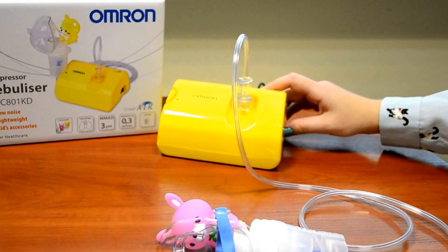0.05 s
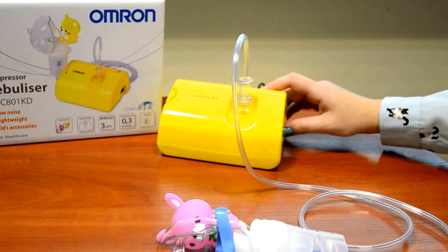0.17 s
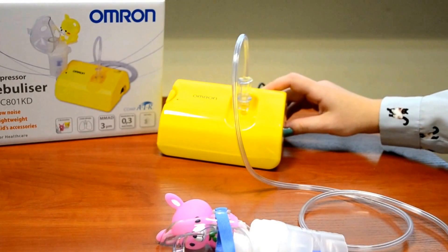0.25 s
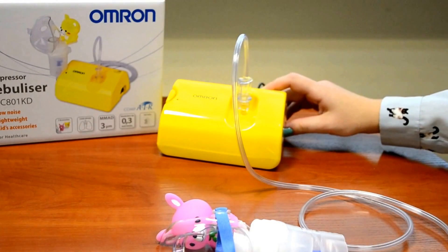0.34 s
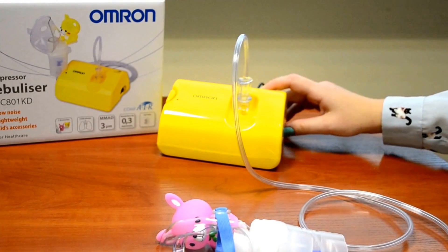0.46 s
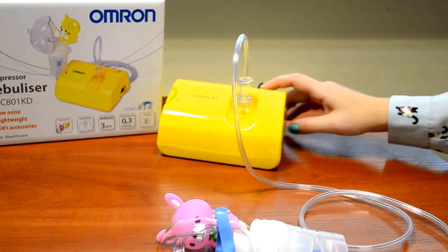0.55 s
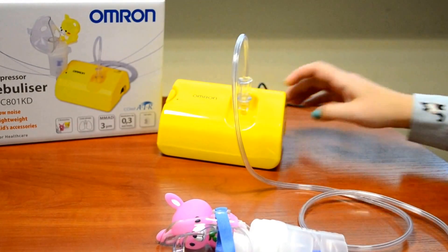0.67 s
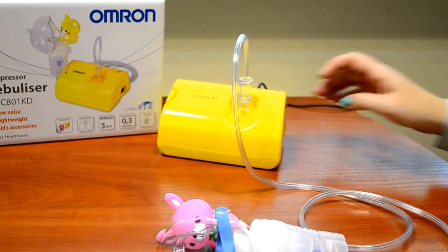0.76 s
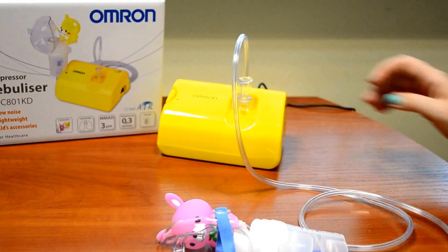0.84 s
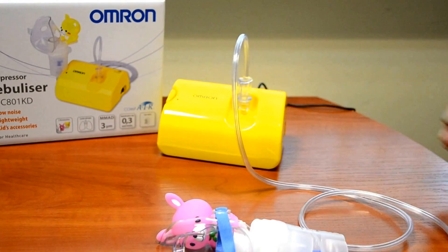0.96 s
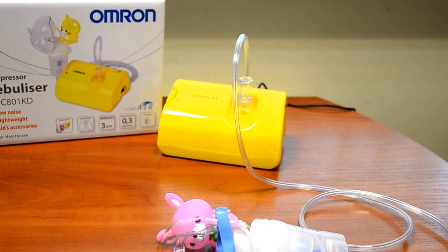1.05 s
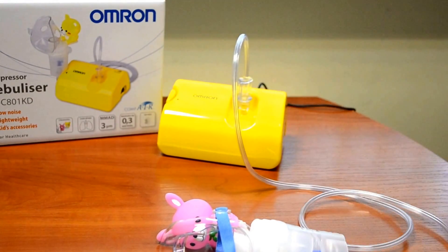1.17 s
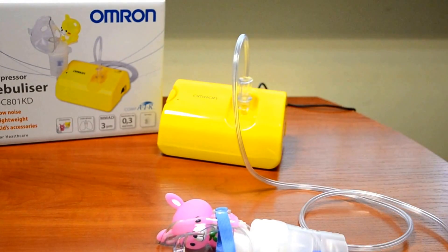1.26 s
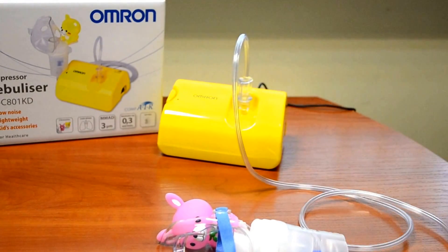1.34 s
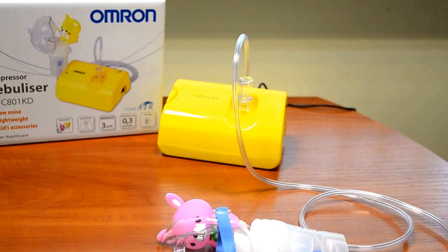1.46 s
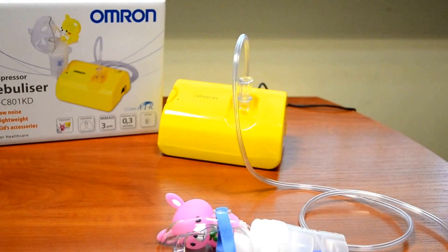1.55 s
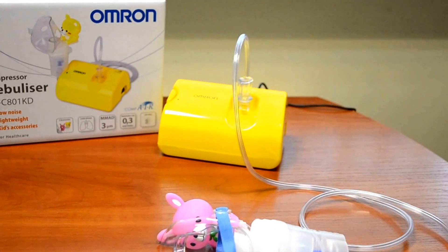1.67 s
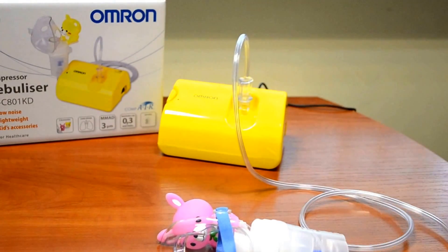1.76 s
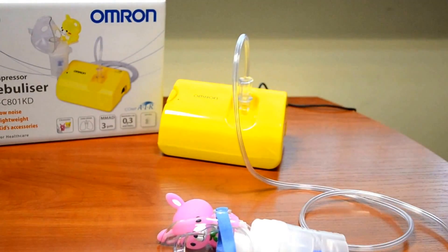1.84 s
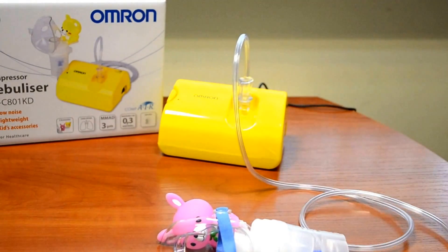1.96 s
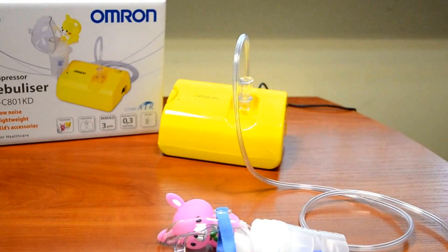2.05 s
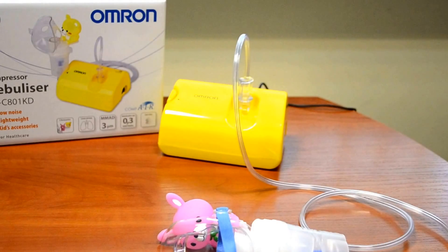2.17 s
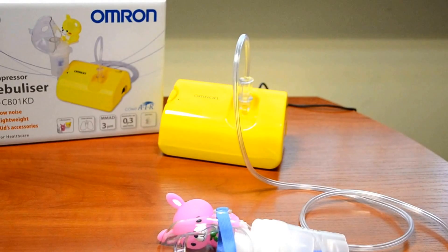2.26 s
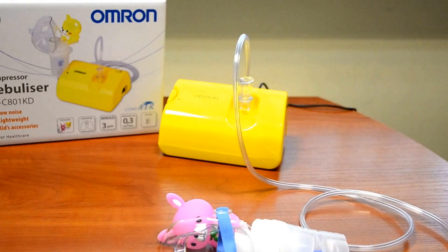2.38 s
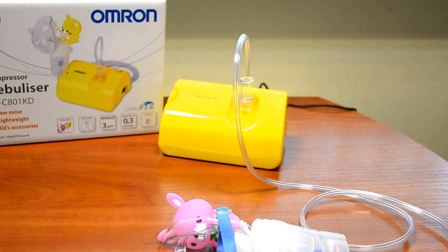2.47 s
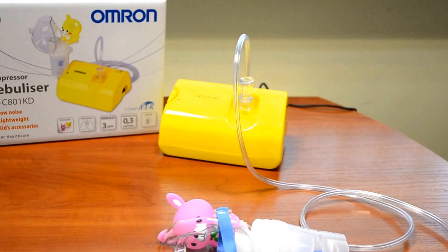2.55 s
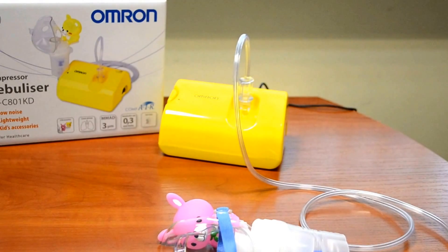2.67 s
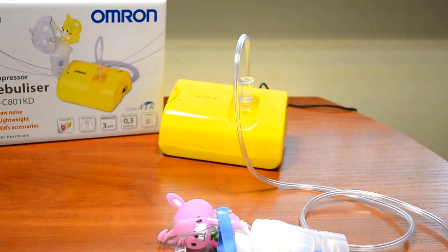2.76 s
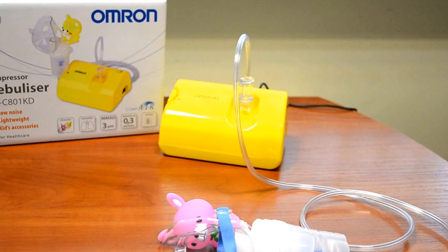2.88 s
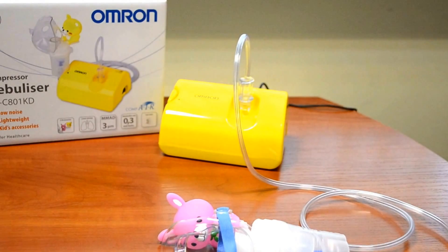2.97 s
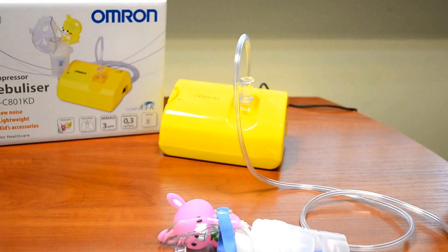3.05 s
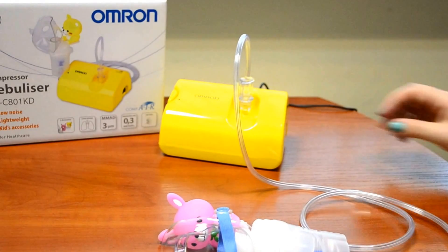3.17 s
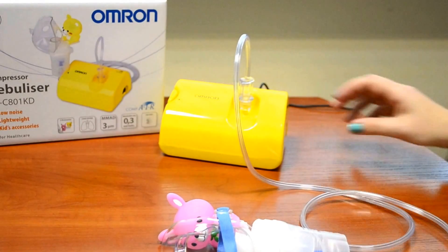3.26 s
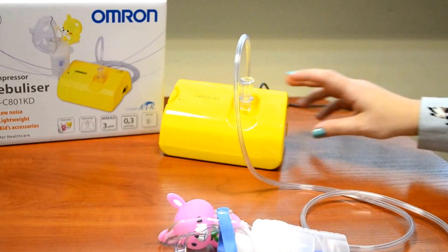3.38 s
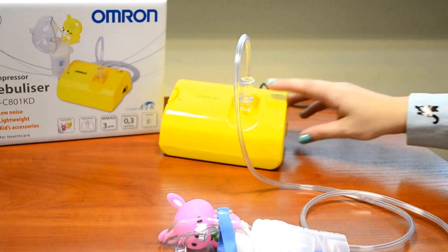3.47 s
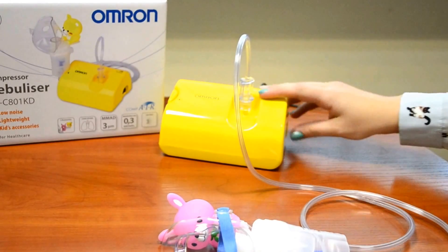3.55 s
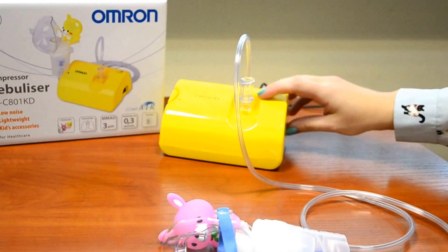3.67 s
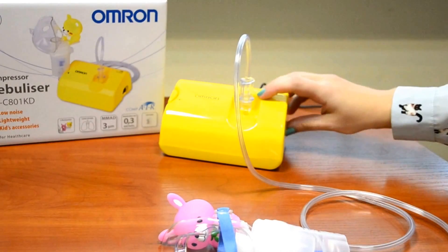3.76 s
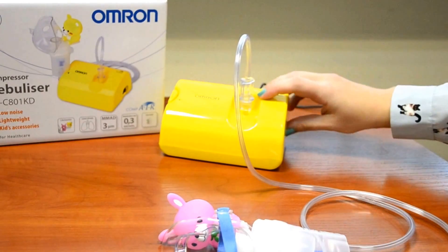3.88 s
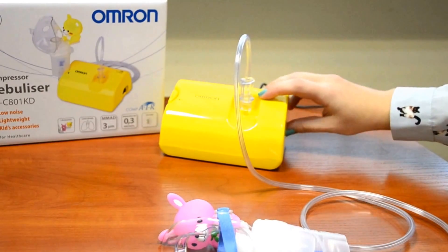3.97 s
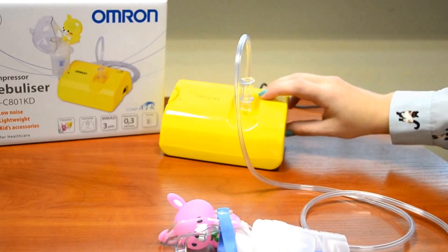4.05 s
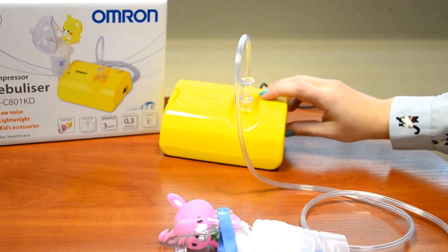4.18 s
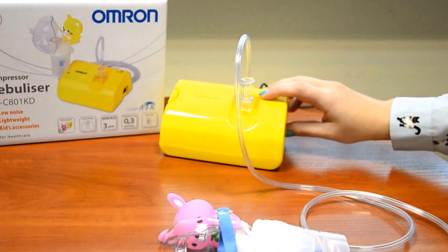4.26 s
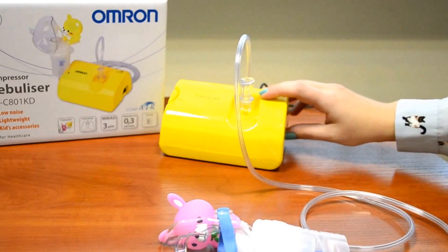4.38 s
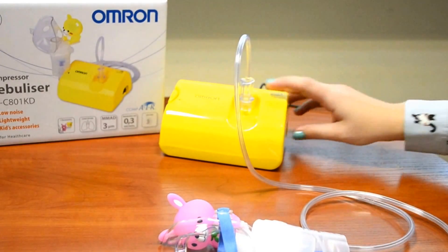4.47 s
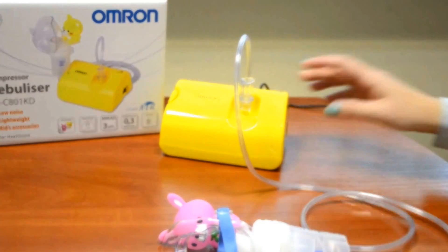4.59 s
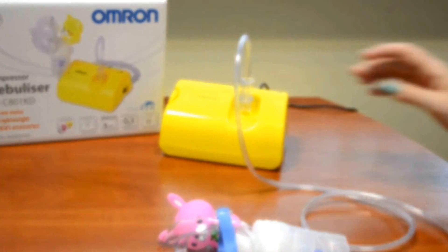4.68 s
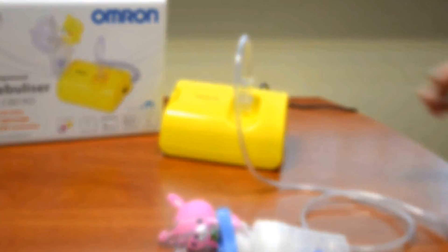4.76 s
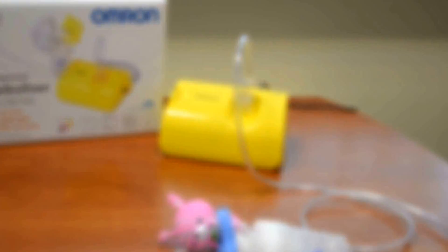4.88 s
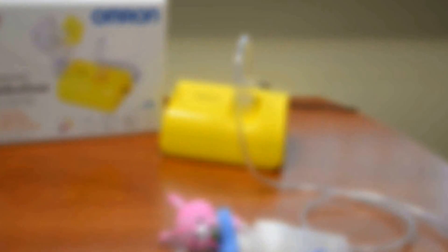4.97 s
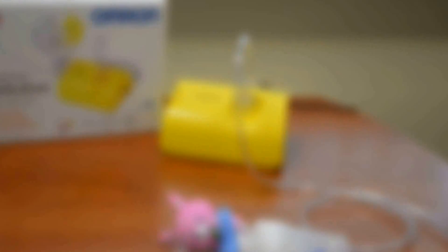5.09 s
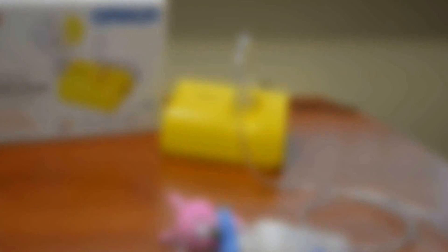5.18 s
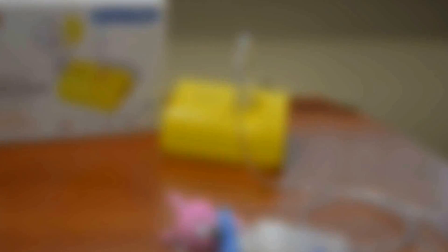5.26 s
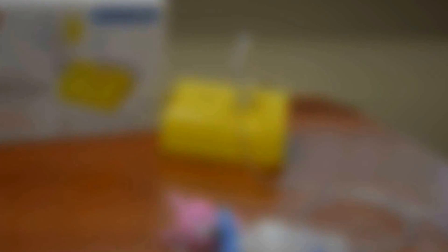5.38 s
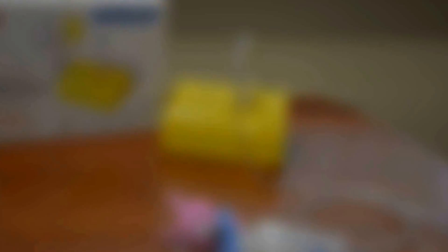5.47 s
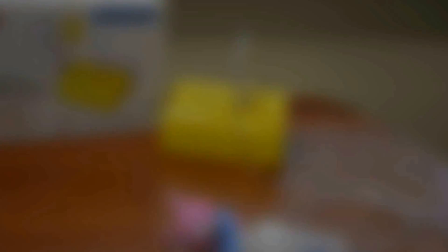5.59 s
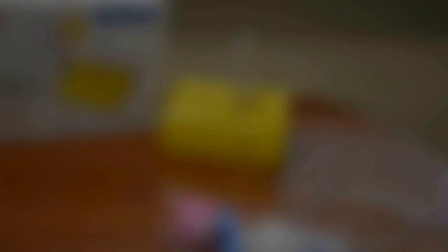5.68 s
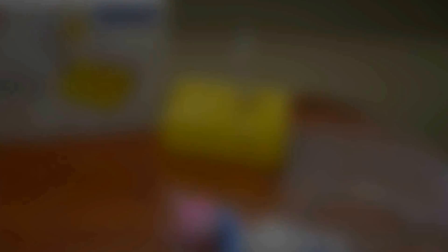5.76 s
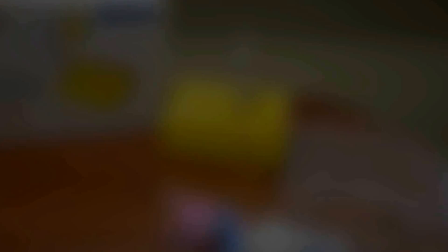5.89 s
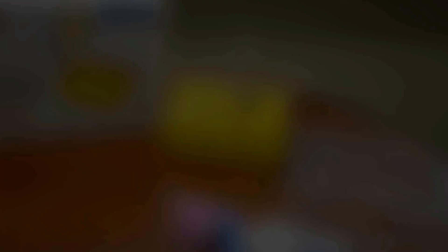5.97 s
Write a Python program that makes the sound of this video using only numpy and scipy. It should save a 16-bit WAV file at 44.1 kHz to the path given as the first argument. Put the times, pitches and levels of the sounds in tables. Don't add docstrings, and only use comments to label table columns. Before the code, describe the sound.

From 0 to about 4.1 seconds a small piston air compressor on a wooden table runs close to the microphone. It gives a steady, buzzing tonal drone, with a rapid pulse of about seventy turns a second, dense mid-range overtones, fluttering valve rattle and a thin bright air hiss. Its pitch creeps up very slightly and individual tones waver. Soft knocks and a sleeve brush are nearly buried; a faint tap comes near 3.75. At 4.07 a rocker switch snaps with a crisp double plastic click and short room echo. The drone collapses within a fraction of a second, with a brief puff as hose air bleeds out by roughly 4.3. A quiet indoor murmur with faint electrical tones remains. A tiny tap comes at 4.74, a dull table bump with cloth scuff at 5.15, and a small snap at 5.76. Everything fades from about 4.9 to silence near 6.2.

```python
import sys
import numpy as np
from scipy import signal
from scipy.fft import rfft, irfft, next_fast_len
from scipy.io import wavfile
from scipy.ndimage import uniform_filter1d, map_coordinates

SR = 44100
rng = np.random.default_rng(int(sys.argv[2]) if len(sys.argv) > 2 else 0)


def digitize_waveform(pressure):
    field = np.atleast_2d(pressure).T
    bounded = np.clip(field, -1, 1)
    quanta = np.round(bounded * 32767).astype(np.int16)
    wavfile.write(sys.argv[1], SR, quanta)


def how_loud(loudness_db):
    steps = np.asarray(loudness_db, float) / 20
    return 10 ** steps


N = 265923
TIME_S = np.arange(N) / SR
OFF_S = 4.075


def unit(x):
    return x / np.sqrt(np.mean(x ** 2) + 1e-20)


def along(points, hz):
    f, v = np.transpose(points)
    return np.interp(np.log(hz + 1), np.log(f + 1), v)


def since(s):
    return np.maximum(TIME_S - s, 0)


def swell(peak_s, peak_db, rise, fall):
    late = TIME_S - peak_s
    return how_loud(peak_db + np.where(late < 0, rise, -fall) * late)


def wobble(rate):
    knots = rng.standard_normal(int(N * rate / SR) + 4)
    return map_coordinates(knots, [np.arange(N) * rate / SR], order=1)


def filtered(x, response):
    m = next_fast_len(N + SR // 2)
    return irfft(rfft(x, m) * response(np.fft.rfftfreq(m, 1 / SR)), m)[:N]


def peaks(modes, hz):
    return np.sqrt(sum(how_loud(2 * db) / (1 + (2 * (hz - c) / w) ** 2) for c, w, db in modes))


def noise(response):
    return unit(filtered(rng.standard_normal(N), response))


def clicks(rows, crack, attack):
    out = np.zeros(N + SR)
    t = np.arange(SR // 5) / SR
    for s, db, hz, t60 in rows:
        ragged = 1 + crack * unit(uniform_filter1d(rng.standard_normal(len(t)), size=16))
        envelope = how_loud(db - 60 * t / t60) * (1 - np.exp(-t / attack)) * ragged
        out[round(s * SR):][:len(t)] += envelope * np.sin(2 * np.pi * hz * t)
    return out[:N]


# pitch_hz, density_db
MURMUR = [(25, -38), (60, -25), (200, -14), (344, -4), (464, -12.5), (610, -5.5), (1000, -13.5),
          (1700, -17), (3000, -25.5), (3600, -23.5), (4500, -31.5), (7300, -36.5), (7900, -46), (8600, -33),
          (11500, -37)]
# pitch_hz, rms_db
APPLIANCE_TONES = [(1099, -66.5), (1798.5, -72), (2799, -86.5), (3998.6, -83.5)]
# pitch_hz, level_db
MAINS_BUZZ = [(1500, -60.5), (2000, -13), (2300, -8), (4000, -10), (5000, -17), (5800, -23), (6500, -19.5),
              (7900, -23.5), (9000, -13.5), (9200, 0), (9500, -5.5), (10400, -9.5), (11000, -14),
              (11500, -20.5)]


def room_tone():
    hum = sum(how_loud(db + 6.5 + 0.88 * wobble(7.4)) * np.sin(2 * np.pi * hz * TIME_S)
              for hz, db in APPLIANCE_TONES)

    mains_hz = 49.985
    order = np.arange(513)
    strength_db = along(MAINS_BUZZ, order * mains_hz) + 2.5 * rng.standard_normal(len(order))
    strength_db -= 4 * (order % 2)
    phase = np.exp(2j * np.pi * rng.random(len(order)))
    cycle = irfft(how_loud(strength_db) * (order * mains_hz < 12000) * phase)
    place = TIME_S * mains_hz % 1 * len(cycle)
    buzz = unit(map_coordinates(cycle, [place], mode="grid-wrap"))

    murmur_db = -53.5 - 1 * since(OFF_S) + 0.68 * wobble(4)
    murmur = noise(lambda hz: how_loud(along(MURMUR, hz)))
    return hum + how_loud(-70.5) * buzz + how_loud(murmur_db) * murmur


# pitch_hz, t60_s
WALL_DECAY = [(200, .5), (1000, 0.45), (3000, 0.29), (8000, 0.29)]


def walls(x):
    hz, t, z = signal.stft(rng.standard_normal(SR // 2), SR, nperseg=256)
    decay = how_loud(-60 * t / along(WALL_DECAY, hz)[:, None])
    tail = signal.istft(z * decay, SR, nperseg=256)[1]
    return signal.fftconvolve(np.pad(x, (200, 0)), tail / np.linalg.norm(tail))[:N]


# start_s, peak_db, pitch_hz, t60_s
KNOCKS = [(.22, -52, 182, .2), (.45, -56, 130, .15), (1.0, -55, 106, .2), (1.01, -49, 190, .2),
          (1.715, -55, 140, .12), (2.35, -54, 150, .12), (4.08, -54, 199, .2), (4.1, -48.5, 319, .2),
          (5.146, -41, 153, .15), (5.15, -48, 330, .12), (5.225, -50, 156, .15)]
# pitch_hz, density_db
CLOTH_COLOUR = [(240, -26), (400, -4), (797, -8.5), (926, -9), (1010, -9), (1850, -12), (5850, -34.5),
                (8000, -43.5), (10400, -73), (17600, -120)]


def bump():
    wood = [(190, 85, -3.5), (314, 68, -2.0), (510, 110, -2)]
    fabric = [(2500, 500, -2.5), (3880, 700, 0), (5300, 500, -2)]
    body = swell(5.162, -48, rise=420, fall=70) * noise(lambda hz: peaks(wood, hz) ** 2)
    sleeve = swell(3.0, -46.5, rise=250, fall=200) * noise(lambda hz: peaks(fabric, hz))
    scuff = swell(5.144, -44.5, rise=900, fall=160) * noise(lambda hz: how_loud(along(CLOTH_COLOUR, hz)))
    return clicks(KNOCKS, crack=0, attack=0.0062) + body + scuff + sleeve


# start_s, peak_db, pitch_hz, t60_s
TAPS = [
    (3.7452, -41, 3500, .06),
    (4.7396, -49, 1300, 0.014),
    (4.7403, -47, 2400, 0.033),
    (4.7426, -46, 480, 0.023),
    (4.7436, -49, 2300, 0.035),
    (4.7421, -50, 4000, .025),
    (4.7431, -55, 6340, .015),
]
# start_s, peak_db, pitch_hz, t60_s
LAST_SNAP = [(5.7608, -28, 1000, 0.025), (5.7608, -26, 3670, 0.011), (5.7608, -29, 4700, 0.011),
             (5.7612, -39, 6340, 0.013), (5.7618, -30, 2430, 0.016), (5.7612, -36, 1600, 0.016),
             (5.7641, -36.5, 440, .03), (5.761, -34, 2840, .011), (5.7626, -37, 1900, .025),
             (5.7665, -37, 750, .03)]


def small_ticks():
    ticks = clicks(TAPS + LAST_SNAP, crack=.35, attack=0.00034)
    return filtered(ticks, lambda hz: 1 / (1 + (hz / 6800) ** 14))


# start_s, peak_db, pitch_hz, t60_s
ROCKER = [(4.0712, -20, 8460, 0.0095), (4.0713, -23.5, 6500, 0.012), (4.0716, -26, 4750, 0.011),
          (4.0724, -28.5, 7100, 0.0091), (4.0757, -18.5, 3460, 0.011), (4.0763, -19, 1834, 0.0065),
          (4.0764, -18.5, 5440, 0.0072), (4.0766, -22, 10200, .008), (4.0768, -19, 2900, 0.0097),
          (4.0785, -13, 2067, 0.0088), (4.0766, -24, 4230, 0.011), (4.078, -23, 2500, 0.037),
          (4.077, -23.5, 1190, .015)]


def rocker_switch():
    return clicks(ROCKER, crack=0.76, attack=0.00027)


# pitch_hz, level_db
ECHO_COLOUR = [(300, -6.5), (1000, -5), (1900, -5.5), (2600, -0.5), (3300, 4), (4000, -5), (5000, -1.5),
               (6500, -1), (10000, -2)]


def hits_in_room():
    switch, ticks = rocker_switch(), small_ticks()
    answer = how_loud(-2) * walls(switch) + how_loud(-24) * walls(ticks)
    echo = filtered(answer, lambda hz: how_loud(along(ECHO_COLOUR, hz)))
    return filtered(switch + ticks + echo, lambda hz: hz ** 4 / (hz ** 4 + 350 ** 4))


# pitch_hz, width_hz, level_db
JET_CAVITIES = [(5970, 480, -4), (6920, 224, -0.5), (8576, 110, -8.5), (9340, 147, -9.5), (10450, 200, -17)]
# share_db, lasts_s, dies_db_per_s
HOSE_EMPTYING = [
    (-1.5, .14, 150),
    (-6, .12, 200),
]


def jet():
    off = since(OFF_S)
    puff_db = 6.5 * (off > 0) * np.exp(-off / .025)
    hiss_db = -42 + puff_db - 20 * off
    hiss = np.zeros(N)
    for cavities, (share_db, lasts, dies) in zip((JET_CAVITIES[:2], JET_CAVITIES[2:]), HOSE_EMPTYING):
        air = noise(lambda hz: peaks(cavities, hz) * (hz / 6000) ** 1.64)
        hiss += how_loud(hiss_db + share_db - dies * since(OFF_S + lasts)) * air
    return hiss


# pitch_hz, density_db
RATTLE_COLOUR = [(35, -56), (60, -28), (230, -22.5), (277, -13), (375, -19.5), (637, -14), (701, -14.5),
                 (846, 1), (1000, -10), (1670, -10), (1940, -6), (2180, -19.5), (2780, -7), (3900, -18),
                 (4910, -22.5), (5500, -28.5), (7150, -48), (12100, -120)]
# pitch_hz, width_hz, level_db
CASING_MODES = [(834, 130, 2.5), (2100, 160, 5.5), (3270, 250, -2), (4460, 22, -3), (4070, 80, -20)]


def valve_rattle(turn):
    colour = noise(lambda hz: how_loud(along(RATTLE_COLOUR, hz)) * np.sqrt(1 + peaks(CASING_MODES, hz) ** 2))
    jolt_db, jolt_s = 5, .025
    level_db = -44.5 + .5 * wobble(3) + jolt_db * np.minimum(since(OFF_S) / jolt_s, 1)
    level_db -= 120 * since(OFF_S + jolt_s)
    return how_loud(level_db) * unit(colour * (1 + 0.37 * np.cos(turn)))


# time_s, turns_per_s
SHAFT_SPEED = [(0, 69.53), (.2, 69.62), (.6, 69.91), (1, 70.1), (1.6, 70.43), (2, 70.61), (2.4, 70.86),
               (2.8, 70.94), (3, 70.93), (3.2, 71.03), (3.6, 71.16), (3.8, 71.26), (4.2, 71.3)]
LOW_ORDERS = [-67, -79, -65, -64, -57.5, -58, -48.5, -50.5, -50.5, -66.5, -47.5, -39.5, -54.5, -62,
              -62.5, -72, -59, -54, -40, -52, -54, -56, -59, -57.5, -44, -42.5, -51, -46.5, -44, -54]
MIDDLE_ORDERS = [-60, -64, -60.5, -62.5, -70.5, -58.5, -59.5, -55, -66.5, -45, -48, -52.5, -56.5, -50, -56.5,
                 -57.5, -69.5, -64.5, -72.5, -63, -72.5, -68, -78, -60, -58.5, -57.5, -76.5, -65, -62, -62]
HIGH_ORDERS = [-64, -74, -68, -71, -59, -69.5, -65.5]
# pitch_hz, width_hz, level_db
TABLE_AND_SHELL_MODES = [(283.6, 12, 19), (428, 11, 8), (492.1, 6.8, -9.5), (639.5, 7.2, 5.5), (712, 5.2, 13),
                         (775.5, 8, 5), (843.5, 4.8, -5), (1120.5, 25.5, 25.5), (1333.6, 36, -25), (1780, 12, -16.5),
                         (1818.9, 24.6, -18), (1905, 12, 8), (1962, 30, 10.5), (2047, 24, -15.5),
                         (2117.9, 20, -25.0), (2250, 17.6, 15.5), (2332.2, 20, 10), (2787, 23, -9.5),
               (2910, 49.5, -11.3), (3002, 42.2, -13), (3121.2, 11.4, -11), (3247.1, 11.5, -25.0),
               (3289.3, 20.5, 14), (3450.3, 150, 12.5), (3595, 25.9, 16), (3670, 38.4, 12.5),
               (3963, 45.4, -17.5), (4685.2, 23.4, 11)]
# start_s (its middle), length_s, pitch_hz, level_db
TONE_FALTERS = [(.045, 0.035, 835, 5.5), (.12, .05, 835, -16), (0.212, 0.071, 835, 4),
                (.2, 0.051, 1950, -4), (.55, .12, 1817, -5), (.85, 0.091, 1890, -16),
                (2.25, 0.082, 1980, -10), (3, .08, 851, 2.5), (3.473, .08, 853, -3), (3.7, .5, 569, -6),
                (3.85, .15, 1920, 4), (4.02, 0.11, 285, -7.5)]


def compressor():
    speed = np.interp(TIME_S, *np.transpose(SHAFT_SPEED))
    turn = 2 * np.pi * np.cumsum(speed * (1 + .0002 * wobble(30))) / SR
    slow = np.arange(0, N, 128)
    run = np.arange(round((OFF_S + .4) * SR))
    off = since(OFF_S)[slow]
    coast_db = -16 * np.minimum(off / 0.027, 1) - 220 * off
    rock_db = -40 * (off / .18) ** 3

    def waver(rate):
        return np.interp(slow * rate / SR, np.arange(100), rng.standard_normal(100))

    tones = np.zeros(N)
    for k, order_db in enumerate(LOW_ORDERS + MIDDLE_ORDERS + HIGH_ORDERS, 1):
        hz = k * speed[slow]
        level_db = order_db + (0.5 + 0.015 * k) * waver(2) + 0.53 * waver(14)
        for c, w, db in TABLE_AND_SHELL_MODES:
            level_db += db / (1 + (2 * (hz - c) / w) ** 2)
        for s, length, c, db in TONE_FALTERS:
            this_order = abs(hz - c) < speed[0] / 2
            level_db += db * np.exp(-((slow / SR - s) / length) ** 2) * this_order
        level_db += rock_db if k == 1 else coast_db
        strength = np.interp(run, slow, how_loud(level_db))
        tones[:len(run)] += strength * np.sin(k * turn[run] + rng.uniform(0, 2 * np.pi))
    return tones + valve_rattle(turn)


def scene():
    return (room_tone() + bump() + hits_in_room() + jet() + compressor())[None]


# pitch_hz, level_db
BAND_EDGES = [(25, -6.5), (55, -1.5), (10500, 0.5), (11200, -12), (11700, -26.5), (11950, -38.5),
              (12100, -92)]


def narrow_band(x):
    return filtered(x, lambda hz: how_loud(along(BAND_EDGES, hz)))


VOLUME_STEPS = [-67, -67, -69, -74, -65, -66.5, -73, -85]


def stepped_fade(x):
    end_s, length_s = 6.24, 1.31
    first_s, every_s = 4.5859, .12513
    jumps = np.zeros(N)
    for k, db in enumerate(VOLUME_STEPS):
        jumps[round((first_s + k * every_s) * SR)] = how_loud(db + 15)
    ticks = filtered(jumps, lambda hz: (hz > 9000) & (hz < 16000))
    return x * np.clip((end_s - TIME_S) / length_s, 0, 1) + ticks


def band_limit(x):
    return signal.sosfilt(signal.butter(12, 16000, fs=SR, output="sos"), x)


def record(dry):
    mix = stepped_fade(narrow_band(dry[0]))[None]
    return band_limit(mix)


dry = scene()
out = record(dry)
digitize_waveform(out)
```